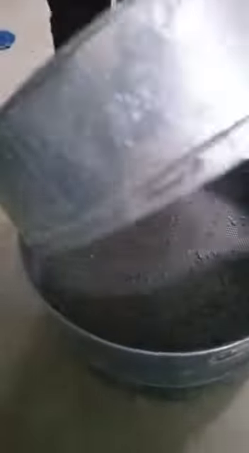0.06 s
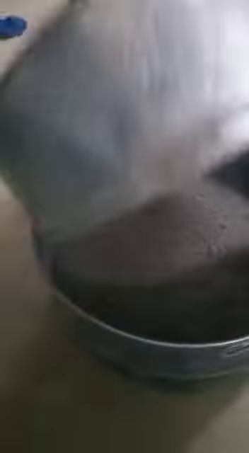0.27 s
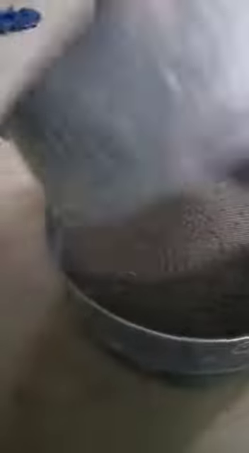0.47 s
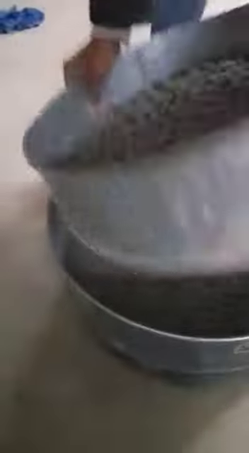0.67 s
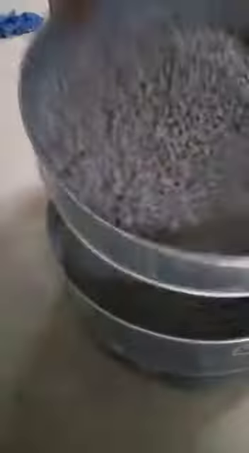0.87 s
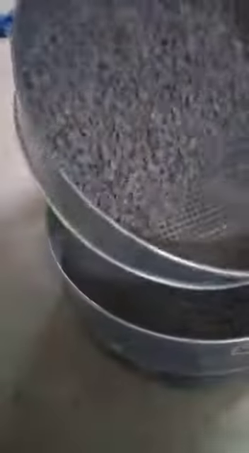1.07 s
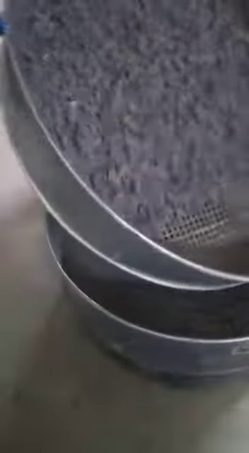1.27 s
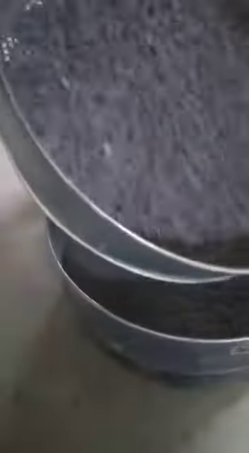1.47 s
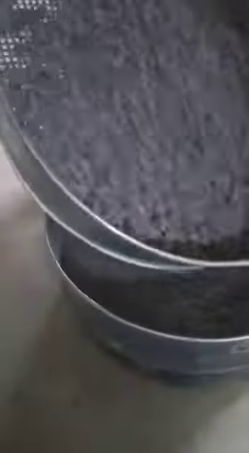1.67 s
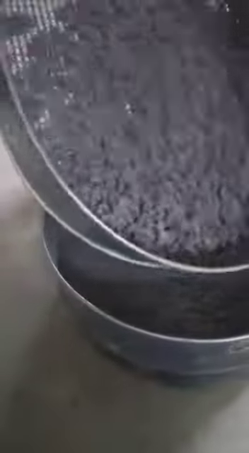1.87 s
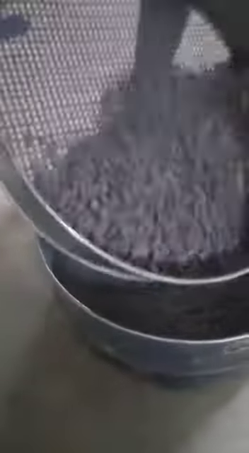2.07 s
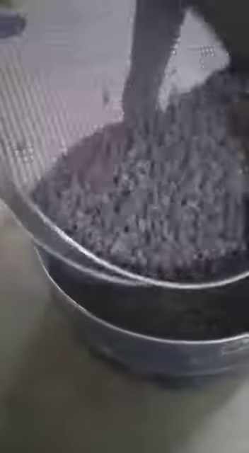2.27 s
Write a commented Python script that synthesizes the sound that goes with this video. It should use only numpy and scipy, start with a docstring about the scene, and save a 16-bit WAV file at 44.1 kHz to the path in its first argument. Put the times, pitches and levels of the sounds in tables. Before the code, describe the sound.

Gravel rattles in a metal sieve, with one short toss peaking around 0.35 seconds as fine grit hisses through. From 0.6 to about 1.3 seconds, low thumps and hollow rubbing sound at the microphone. From 1 second the stones slide in a longer pour, landing in clumps and ringing the metal, loudest near 1.4 seconds and dying away by 2.4. A quiet room hum lies underneath.

```python
"""Gravel slides in a round metal sieve, in a quietly humming room.
First comes one short toss: stones strike the mesh and the wall, and fine grit hisses through.
From 0.6 s, as the sieve swings round, handling thumps and rubs at the microphone.
From about 1 s the sieve is tilted for a long pour. Stones land singly and in clumps, making
the metal ring; the pour is loudest near 1.4 s and dies away by 2.4 s."""
import sys
import numpy as np
from scipy import signal
from scipy.fft import rfft, irfft, next_fast_len
from scipy.io import wavfile
from scipy.ndimage import map_coordinates

SR = 44100
rng = np.random.default_rng(int(sys.argv[2]) if len(sys.argv) > 2 else 0)


def wrap_up_sound(samples):
    """Save the sound to the file named by the first command line argument, as 16-bit audio."""
    columns = np.atleast_2d(samples).T
    # keep every value between -1 and 1, then stretch to whole-number steps
    tamed = np.clip(columns, -1, 1)
    steps = np.round(tamed * 32767).astype(np.int16)
    wavfile.write(sys.argv[1], SR, steps)


N = 105840
T = np.arange(N) / SR


def amp(db):
    """Turn decibels into a number to multiply by."""
    return 10 ** (np.asarray(db) / 20)


def unit(x):
    """Scale a sound to an average (rms) strength of 1."""
    return x / np.sqrt(np.mean(x ** 2) + 1e-20)


def curve(rows):
    """Join (seconds, value) points with straight lines."""
    return np.interp(T, *np.transpose(rows))


def wobble(per_s):
    """A smooth curve through per_s random values a second."""
    return map_coordinates(rng.standard_normal(1000), [T * per_s + 2], mode="mirror")


def filtered(x, response):
    """Multiply each frequency in x by response(frequency)."""
    size = 2 * next_fast_len(N // 2 + SR // 4)
    return irfft(rfft(x, size) * response(np.fft.rfftfreq(size, 1 / SR)), size)[:N]


def coloured(x, points):
    """Give x a tone colour from (Hz, dB) points, at strength 1."""
    def response(hz):
        point_hz, db = np.transpose(points)
        gain = amp(np.interp(np.log(hz + 1), np.log(point_hz + 1), db))
        # keeping half the cepstrum makes each hit sound after its impact, never before
        cepstrum = irfft(np.log(gain))
        half = len(cepstrum) // 2
        return np.exp(rfft(2 * cepstrum[:half], 2 * half))
    return unit(filtered(x, response))


def ringing(x, modes):
    """Let x ring at (Hz, width, dB) pitches, at strength 1; narrow ones ring longer."""
    def response(hz):
        total = 0
        for pitch, width, db in modes:
            resonance = 1j * hz * width / (pitch ** 2 - hz ** 2 + 1j * hz * width)
            steep_sides = (2 * hz * pitch / (hz ** 2 + pitch ** 2)) ** 3
            total += amp(db) * steep_sides * resonance
        return total
    return unit(filtered(x, response))


def contacts(per_s, spread_db):
    """Tiny clicks at random times and of random sizes, at strength 1."""
    hit = rng.random(N) < per_s / SR
    size = amp(spread_db * np.clip(rng.standard_normal(N), -2, 2))
    return unit(hit * size * rng.choice([-1, 1], N))


def burst(start, rise, length, fall):
    """A level that rises to 1, holds until length and dies away; times in seconds."""
    t = T - start
    return np.clip(t / rise, 0, 1) * np.exp(-np.maximum(t - length, 0) / fall)


def echoes(x, fade_s=0.11, echo_db=-10):
    """Add short echoes from the pan below and the floor."""
    t = T[:SR // 2]
    tail = rng.standard_normal(len(t)) * amp(-60 * t / fade_s)
    echo = signal.fftconvolve(x, tail / np.linalg.norm(tail))[:N]
    return (x + amp(echo_db) * echo) / np.hypot(1, amp(echo_db))


# The room's hum. Each row: pitch in Hz, level in dB.
HUM_TONES = [(248, -47), (323, -43.5)]
# A low rumble. Each row: time in seconds, level in dB.
RUMBLE_LEVEL = [(0, -33), (.06, -27), (.16, -39), (.28, -37), (.42, -43), (.52, -51), (.61, -35.5),
                (1.1, -43), (1.26, -29.5), (1.45, -40), (1.77, -36.5), (2.1, -48), (2.4, -34.5)]
# Tone of the rumble and of the room noise. Each row: frequency in Hz, relative level in dB.
RUMBLE_TONE = [(25, -35), (42, -20), (54, -4), (68, 6.5), (80, -12), (100, -13), (200, -58)]
ROOM_TONE = [(25, -34), (50, -14), (100, -3.5), (160, 2.5), (220, -2.5), (330, -1), (450, -5), (650, -13.5),
             (1200, -11.5), (4000, -20), (10000, -46), (15000, -50)]
def background():
    """Steady room noise, a wavering hum and a rumble that comes and goes."""
    hum = sum(amp(db + wobble(8.9)) * np.sin(2 * np.pi * hz * T + .6 * wobble(8.7))
              for hz, db in HUM_TONES)
    rumble = amp(curve(RUMBLE_LEVEL)) * coloured(rng.standard_normal(N), RUMBLE_TONE)
    return hum + rumble + amp(-40.5) * coloured(rng.standard_normal(N), ROOM_TONE)


# Tone of the scuff and of the deep rubbing. Each row: frequency in Hz, relative level in dB.
SCUFF_TONE = [(150, -12), (400, -6), (700, 2), (1000, -12.5), (1600, -10), (2500, -26), (7000, -39),
              (9000, -45), (15000, -62)]
DEEP_RUB_TONE = [(50, -29.5), (95, -11.5), (125, 0.5), (170, 4), (230, -5), (330, -2.5), (470, -10),
                 (620, -14.5), (900, -19), (1500, -25), (3000, -41.5), (7000, -61), (8500, -80),
                 (15000, -89)]
# Deep and hollow rubbing. Each row: time in seconds, level in dB.
DEEP_RUB_LEVEL = [(.592, -46), (.606, -12.5), (.7, -15), (.8, -20.5), (.88, -24), (.96, -19), (1.03, -26.5),
                  (1.07, -22), (1.13, -28), (1.17, -24.5), (1.21, -20.5), (1.25, -36), (1.31, -28),
                  (1.37, -47), (1.46, -62)]
HOLLOW_RUB_LEVEL = [(.59, -83), (.62, -24.5), (.72, -21), (.85, -26.5), (.92, -22), (1.02, -23),
                    (1.07, -12.5), (1.135, -13), (1.18, -21.5), (1.23, -30), (1.29, -26), (1.37, -35),
                    (1.46, -45), (1.55, -80)]
# The hollow ring. Each row: pitch in Hz, width in Hz, relative level in dB.
HOLLOW_RING = [(268, 18, -1.5), (338.5, 28, 0.5), (382, 18, -5.5), (424.3, 35, -4), (462.6, 14, -6.5),
               (550, 17, -26)]
# Soft thumps. Each row: start in seconds, peak level in dB, pitch in Hz.
SOFT_THUMPS = [(.613, -5.5, 153), (0.654, -7, 162), (0.754, -7, 163), (.828, -15, 167), (1.058, -13.5, 167)]
def handling():
    """The first touch scuffs; then rubbing sticks and slips, from deep to hollow, among thumps."""
    touch = amp(-16.5) * burst(.603, rise=.0017, length=.004, fall=.018)
    scuff = touch * coloured(rng.standard_normal(N), SCUFF_TONE)
    slips = lambda: contacts(per_s=2500, spread_db=1.5)
    deep = amp(curve(DEEP_RUB_LEVEL)) * coloured(slips(), DEEP_RUB_TONE)
    hollow = amp(curve(HOLLOW_RUB_LEVEL)) * ringing(slips(), HOLLOW_RING)
    thumps = 0
    for start, db, hz in SOFT_THUMPS:
        shape = burst(start, rise=.0054, length=.02, fall=.0035)
        thumps += amp(db) * shape * np.sin(2 * np.pi * hz * (T - start))
    return scuff + deep + hollow + thumps


def gravel_hits():
    """The dense patter of gravel touching metal."""
    return contacts(per_s=5000, spread_db=1.5)


# Skating grit. Each row: time in seconds, level in dB.
SIZZLE_LEVEL = [(0, -56), (.4, -46), (.56, -58.5), (.66, -53), (.88, -62.5), (1.0, -51), (1.15, -40.5),
                (1.4, -29.5), (1.7, -46.5), (2.0, -48), (2.4, -65)]
# Its high ring. Each row: pitch in Hz, width in Hz, relative level in dB.
SIZZLE_RING = [(6340, 290, -1), (6900, 220, -0.5)]
def sizzle():
    """Grit skates over the wires with a thin sizzle."""
    return amp(curve(SIZZLE_LEVEL)) * ringing(gravel_hits(), SIZZLE_RING)


# Sliding along the wall. Each row: time in seconds, level in dB.
SLIDE_LEVEL = [(0, -37), (.25, -39.5), (.5, -35.5), (.6, -56)]
# Its tone. Each row: frequency in Hz, relative level in dB.
SLIDE_TONE = [(600, -40), (900, -17.5), (1100, -2.5), (1450, -1.5), (1750, -3.5), (2400, -32), (6000, -69)]
def wall_slide():
    """Stones slide along the wall with a duller sound, mainly during the toss."""
    return amp(curve(SLIDE_LEVEL)) * coloured(gravel_hits(), SLIDE_TONE)


# How hard stones drive the wall. Each row: time in seconds, level in dB.
WALL_DRIVE = [(0, -35.5), (.2, -35.5), (.35, -34.5), (.55, -43.5), (.7, -48), (.85, -45.5), (1.08, -31.5),
              (1.27, -25), (1.44, -29), (1.55, -31.5), (1.68, -35.5), (1.78, -46), (1.95, -39), (2.15, -51),
              (2.4, -60)]
# The wall's ring. Each row: pitch in Hz, width in Hz, relative level in dB.
WALL_RING = [(1452, 25, 1.5), (1492, 43, -5), (1585, 35, -15.5)]
def wall_ring():
    """Stones reach the round wall in uneven spurts and make it ring."""
    spurts_db = 2 * wobble(29.7)
    hits = contacts(per_s=400, spread_db=1.5)
    return amp(curve(WALL_DRIVE) + spurts_db) * ringing(hits, WALL_RING)


# The flow of stones and of grit. Each row: time in seconds, base level in dB.
STONE_FLOW = [(0, -32), (.18, -31.5), (.27, -26.5), (.33, -22), (.41, -21.5), (.5, -29.5), (.58, -42.5),
              (.8, -49.5), (.9, -43.5), (1.0, -33.5), (1.14, -28.5), (1.25, -21), (1.45, -16.5),
              (1.56, -20.5), (1.65, -26.5), (1.8, -27.5), (1.96, -22), (2.02, -25), (2.14, -28.5),
              (2.25, -35.5), (2.31, -37.5), (2.4, -55)]
GRIT_FLOW = [(0.0, -41.5), (0.2, -43), (0.31, -41), (0.33, -32.5), (0.5, -40.5), (0.56, -54), (0.78, -77),
             (1.06, -49), (1.14, -49), (1.16, -40), (1.28, -30.5), (1.46, -30), (1.8, -39.5), (1.98, -32.5),
             (2.31, -56.5), (2.4, -67)]
# Clumps landing. Each row: start in seconds, length in seconds, stone level in dB, grit level in dB.
LANDING_CLUMPS = [(0.207, 0.0078, -28.5, -48), (0.232, 0.0033, -20, -39), (.284, 0.016, -24.5, -35),
                  (0.301, .006, -19, -28), (0.318, 0.015, -15.5, -34), (0.336, 0.0079, -15.5, -50),
                  (.381, 0.0052, -31, -27.5), (0.486, 0.0031, -27.5, -46), (0.978, 0.019, -29.5, -55),
                  (1.163, 0.0067, -23.5, -42), (1.231, 0.0084, -19.5, -29.5), (1.27, 0.014, -16, -33),
                  (1.321, .006, -16.5, -35), (1.367, 0.0063, -15, -25), (1.391, .005, -17.5, -37),
                  (1.447, 0.0068, -16, -54), (1.471, 0.0047, -22, -38), (1.551, 0.0061, -15.5, -29),
                  (1.675, 0.016, -20, -38), (1.721, 0.0063, -22, -45), (1.846, 0.0051, -20, -32),
                  (1.878, 0.0082, -21, -39), (1.956, 0.013, -23, -33), (2.039, 0.0068, -22.5, -31),
                  (2.068, 0.01, -19, -39), (2.102, 0.0094, -23, -34), (2.115, 0.012, -22.5, -47),
                  (2.135, 0.0095, -24.5, -40), (2.188, 0.015, -29.5, -44), (2.252, 0.0056, -35.5, -45),
                  (2.283, 0.018, -33.5, -48)]
# Tone of stones and of grit on the mesh. Each row: frequency in Hz, relative level in dB.
STONE_TONE = [(200, -28), (700, -31.5), (950, -24), (1200, -6.5), (1500, -3), (1900, -4), (2700, -4),
              (3200, -1), (3700, 0), (4400, -8.5), (5500, -15.5), (7000, -15.5), (8500, -33.5),
              (11000, -32), (15000, -25)]
GRIT_TONE = [(1000, -40), (3000, -4), (5000, 4.5), (6900, 8.5), (8500, 0), (10000, -3.5), (12000, 0.5),
             (13500, 3), (14500, -3), (15500, -20)]
# The mesh's ring. Each row: pitch in Hz, width in Hz, relative level in dB.
MESH_RING = [(2035, 26, 1), (2310, 26, -5.5), (2720, 20, -4), (3138, 49, 3), (3463, 55, 6), (3576, 150, 5),
             (3716, 90, 1), (3965, 56, -1.5)]
def gravel_on_mesh():
    """Jostling stones strike the mesh and make it ring, while fine grit runs through."""
    jostle = amp(1.1 * wobble(110))
    stone_power = (amp(curve(STONE_FLOW)) * jostle) ** 2
    grit_power = (amp(curve(GRIT_FLOW) + 0.5) * jostle) ** 2
    for start, length, stone_db, grit_db in LANDING_CLUMPS:
        shape = burst(start, rise=.0037, length=length, fall=.0054)
        stone_power += (amp(stone_db) * shape) ** 2
        grit_power += (amp(grit_db) * shape) ** 2
    force = np.sqrt(stone_power)
    ring_share = amp(-5) * (force / amp(-20)) ** .3  # harder blows ring the mesh more
    ring = ring_share * ringing(gravel_hits(), MESH_RING)
    stones = force * (coloured(gravel_hits(), STONE_TONE) + ring)
    grit = np.sqrt(grit_power) * coloured(contacts(per_s=8000, spread_db=4.5), GRIT_TONE)
    return stones + grit


def scene():
    """Sieve, handling and room in one channel."""
    sieve = echoes(gravel_on_mesh() + wall_slide()) + wall_ring() + sizzle()
    return (sieve + handling() + background())[None]


def record(dry):
    """The microphone drops the deepest bass, rounds off big peaks and cuts the highest treble."""
    lowest_hz, highest_hz, ceiling = 42, 15520, .8
    thinned = signal.sosfilt(signal.butter(4, lowest_hz, "high", fs=SR, output="sos"), dry[0])
    rounded = thinned / (1 + np.abs(thinned / ceiling) ** 6) ** (1 / 6)
    return filtered(rounded, lambda hz: hz < highest_hz)[None]


dry = scene()
out = record(dry)
wrap_up_sound(out)
```